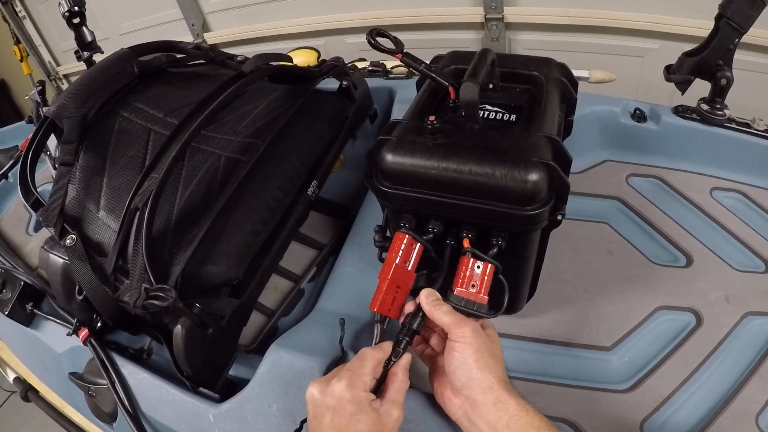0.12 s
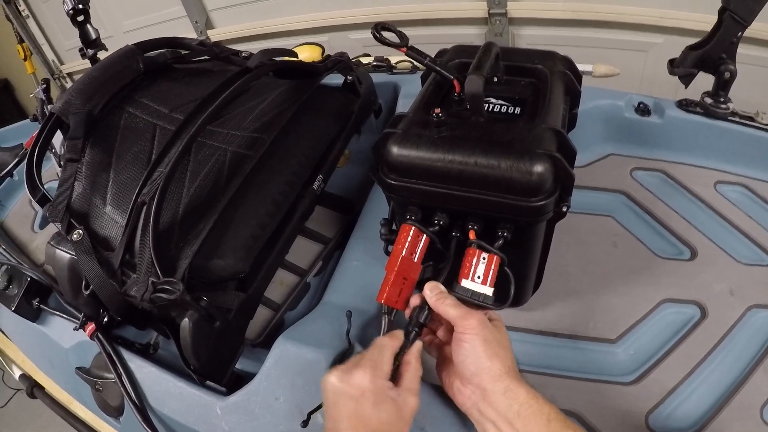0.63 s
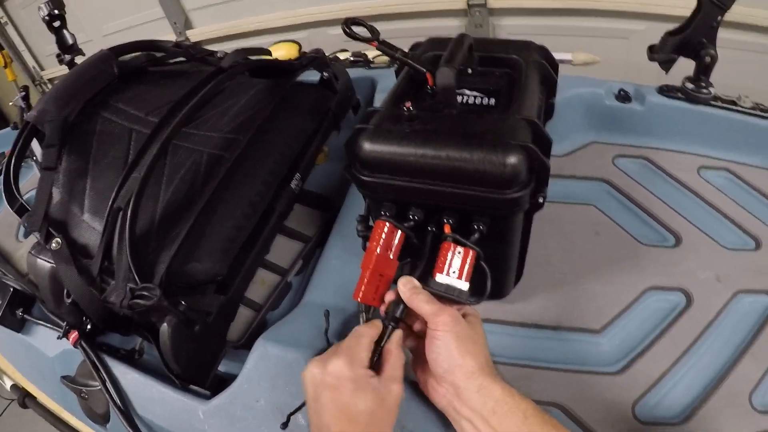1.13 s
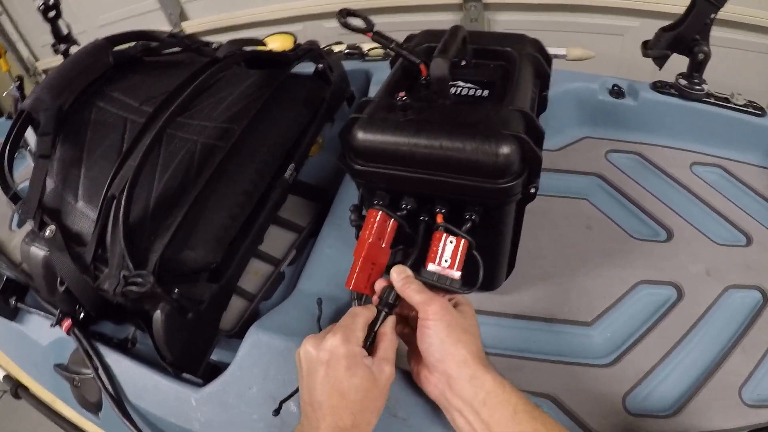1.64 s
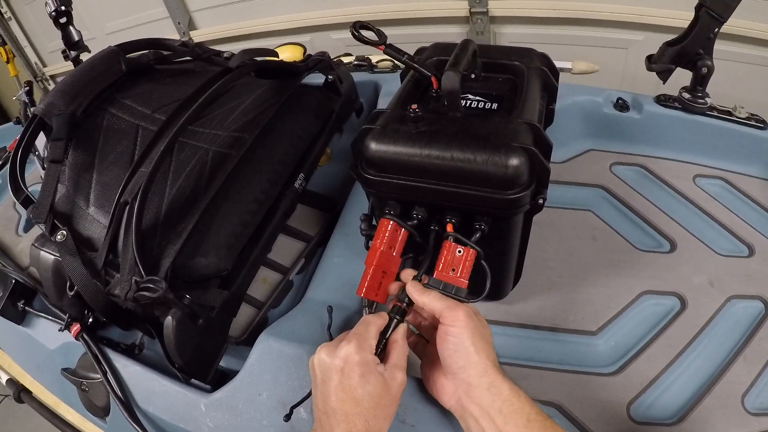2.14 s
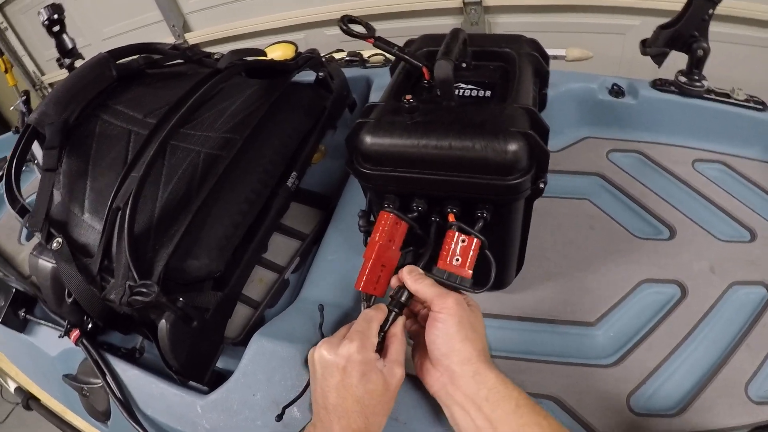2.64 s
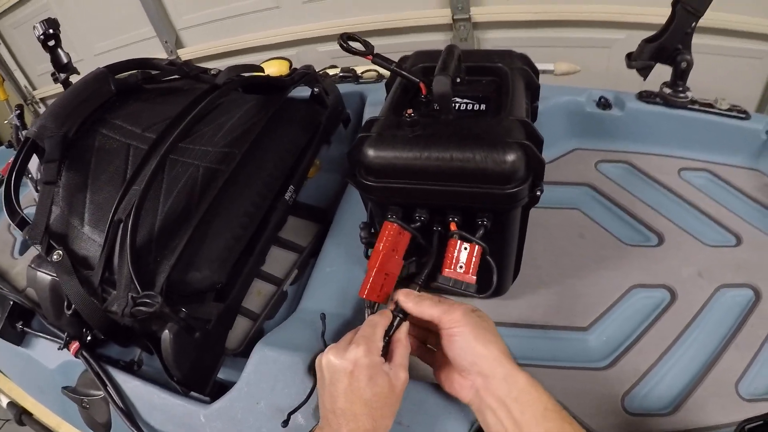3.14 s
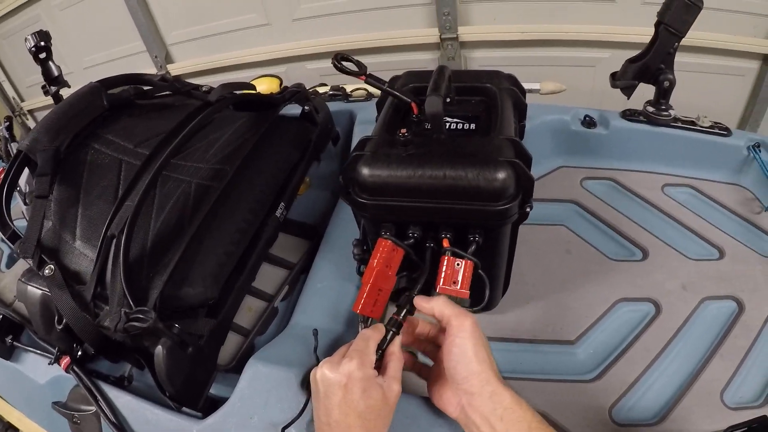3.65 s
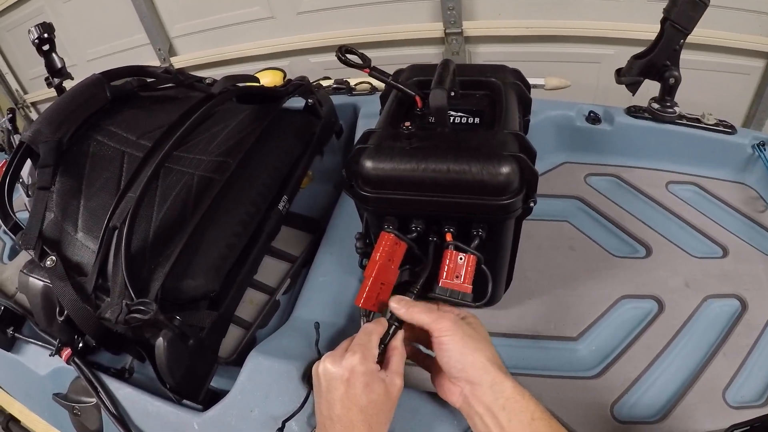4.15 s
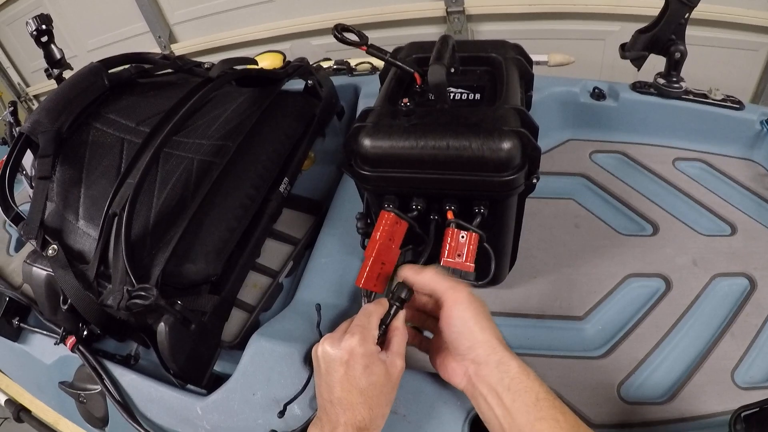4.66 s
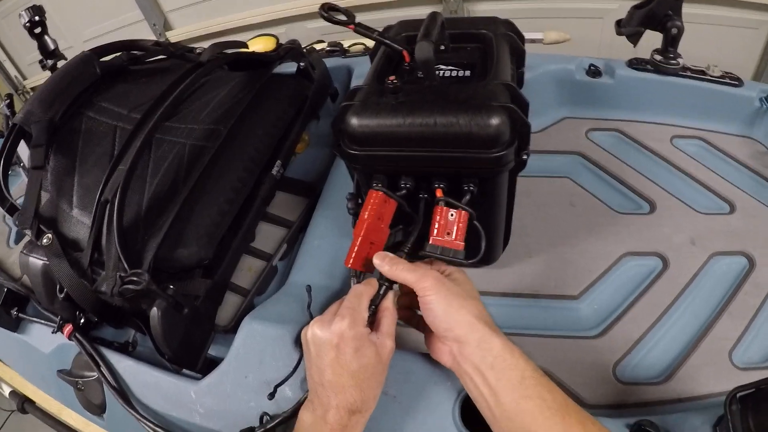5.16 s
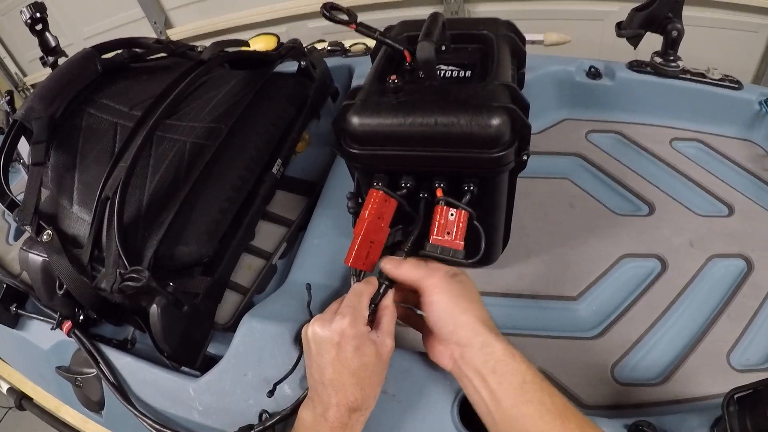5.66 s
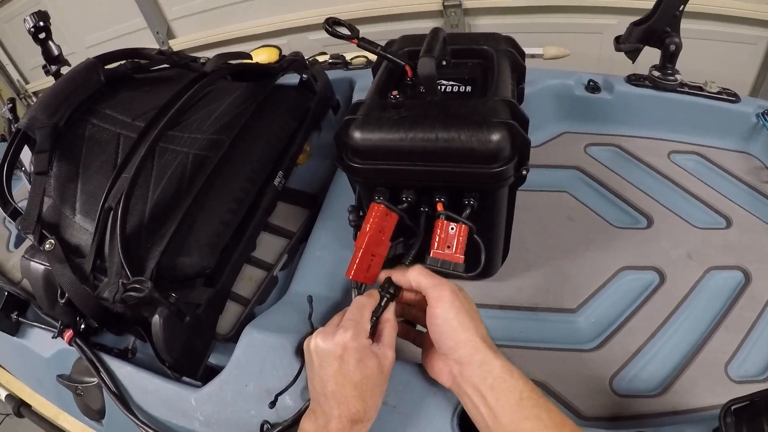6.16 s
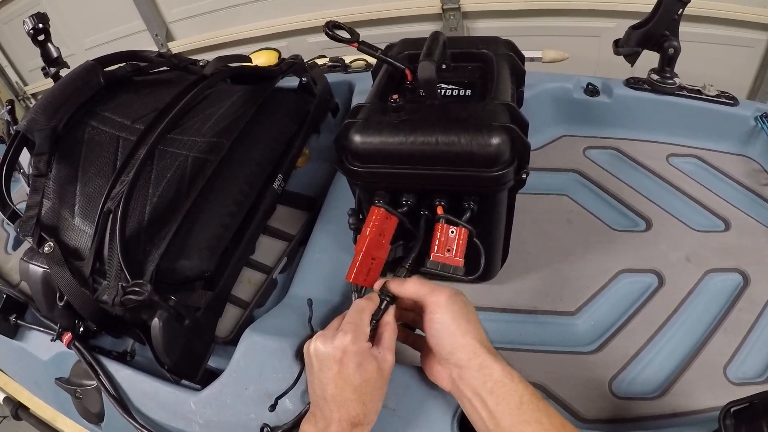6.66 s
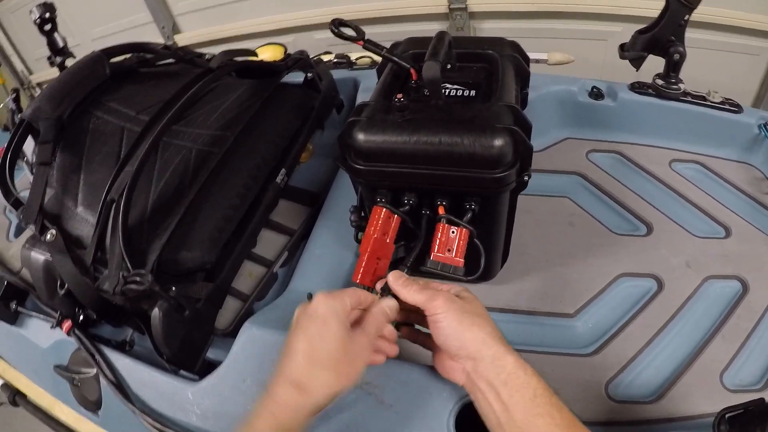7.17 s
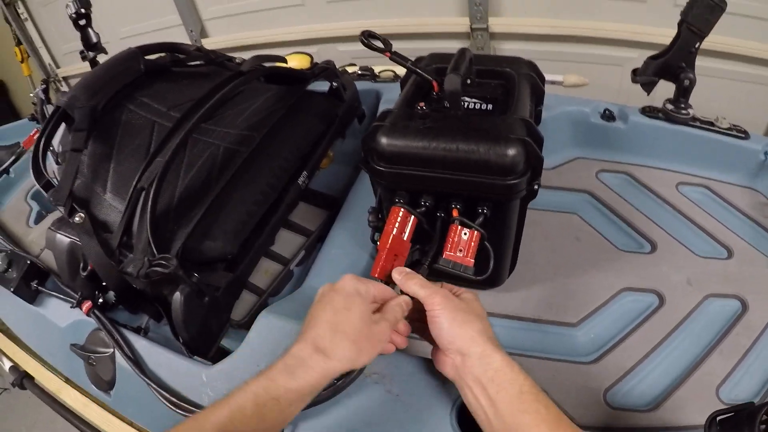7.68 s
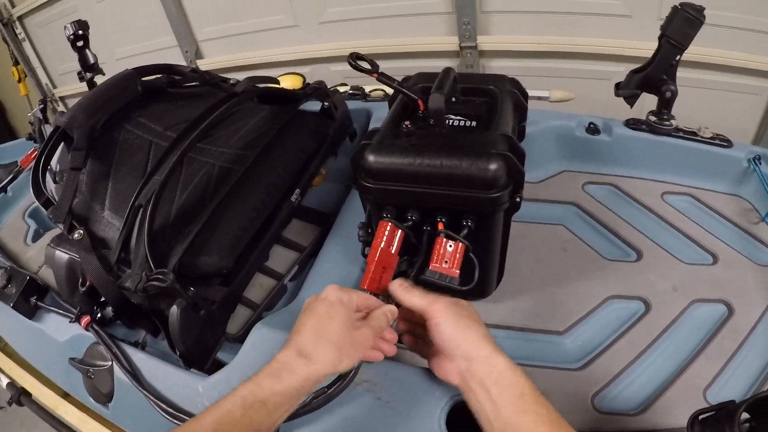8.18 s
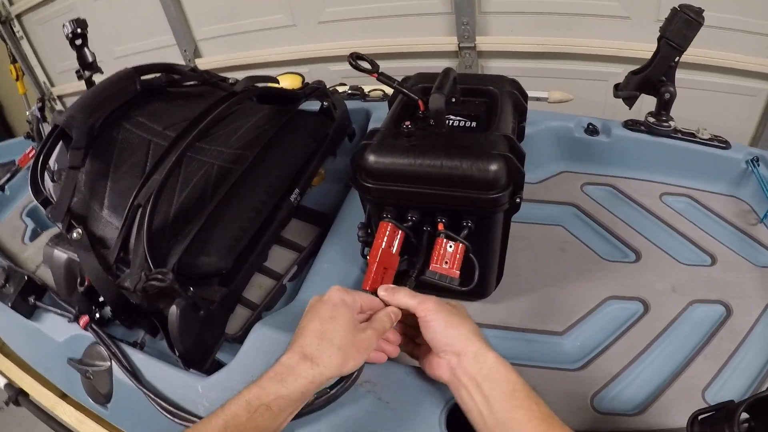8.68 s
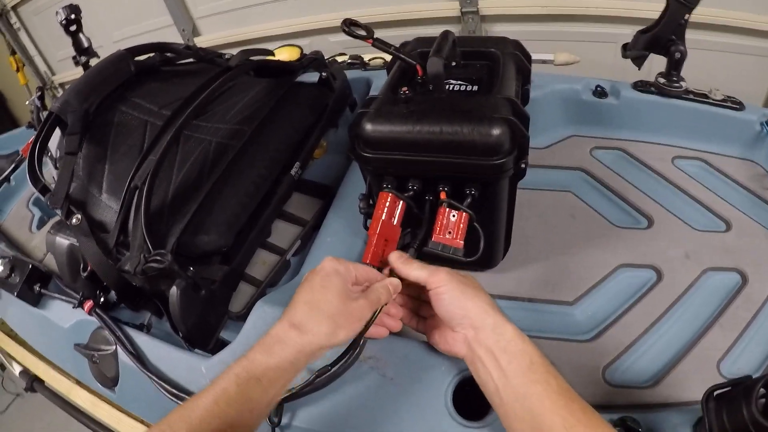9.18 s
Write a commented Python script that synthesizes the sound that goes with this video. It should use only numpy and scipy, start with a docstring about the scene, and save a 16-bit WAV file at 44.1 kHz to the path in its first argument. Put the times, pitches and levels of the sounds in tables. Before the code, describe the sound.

Irregular small plastic clicks, close up, as fingers turn and seat a connector. Each has a bright plug ring and a boxy case knock, some with a crisp crack. Tiny scrapes and rubbing fill the gaps, and hands bump the hollow plastic deck with muted thuds. Busy until just after six seconds, then quieter and sparse. A garage gives a short bright echo over quiet room air.

```python
"""Fingers screw a small plastic plug onto a hard plastic case on the hollow deck of a boat in a garage.
Close by, clicks and taps ring plug, socket and case modes, a few with a treble crack; short scrapes, rattles
and rubs are grains in the same modes. Hands knock the deck, a thud and shell modes, and fumble in small slips.
Hard walls ring on as decaying noise bands, over shaped air noise, thin hum tones and gusts of deep bass.
The microphone is a small camera with two ports and a bass cut."""
import sys
import numpy as np
from scipy import signal
from scipy.fft import rfft, irfft
from scipy.io import wavfile
from scipy.ndimage import uniform_filter1d

SR = 44100
rng = np.random.default_rng(int(sys.argv[2]) if len(sys.argv) > 2 else 0)


def unload_audio(sound):
    """Save the sound as a 16-bit wav file, at the path given as the first command line argument."""
    columns = np.transpose(np.atleast_2d(sound))
    # keep every value between -1 and 1, then stretch to whole-number steps
    steps = np.round(np.clip(columns, -1, 1) * 32767)
    wavfile.write(sys.argv[1], SR, steps.astype(np.int16))


def ratio(d):
    """dB to gain"""
    e = np.asarray(d, float) / 20
    return 10 ** e


N = 410571
TIME = np.arange(N) / SR
SIDES = np.array([[1], [-1]])  # a side signal enters left and right with opposite signs


def level(x, db):
    """Scale to an rms level in dB."""
    return x * ratio(db) / np.sqrt(np.mean(x ** 2))


def on_log_axis(hz, table, column=1):
    """Read a table between its rows on a logarithmic frequency axis."""
    table = np.array(table, float)
    return np.interp(np.log(hz + 1), np.log(table[:, 0]), table[:, column])


def ring(x, modes):
    """A steady rub or rattle heard through the resonances of a body."""
    out = 0
    for hz, width, db in modes:
        b, a = signal.iirpeak(hz, hz / width, SR)
        out = out + ratio(db) * signal.lfilter(b, a, x)
    return out


def strikes(modes, db, rise_s, length_s, scatter_db, aim_hz=None, aim_octaves=1., phase_spread=1.22):
    """One ring per blow, peaking at db; modes near the aimed pitch are favoured, and each mode varies."""
    # axes: blow, mode, time
    hz, width, mode_db = np.transpose(modes)[:, None, :, None]
    chance = rng.standard_normal((len(db), len(modes), 3))
    gain = ratio(mode_db + scatter_db * chance[..., :1])
    if aim_hz is not None:
        octaves_off = np.log2(hz / aim_hz[:, None, None])
        gain = gain / (1 + (octaves_off / aim_octaves) ** 2) ** 1.28
    t = np.arange(int(length_s * SR)) / SR
    detune = 1 + 0.025 * chance[..., 1:2]
    phase = 2 * np.pi * hz * detune * t + phase_spread * chance[..., 2:]  # radians
    decay = np.exp(-np.pi * width * t)
    rings = (gain * decay * np.sin(phase)).sum(axis=1)
    rings = rings * (1 - np.exp(-t / rise_s)) ** 2
    return rings * (ratio(db) / np.abs(rings).max(axis=1))[:, None]


def place(times, rings, pan_db):
    """Lay each ring down at its moment; pan_db is how far left stands above right."""
    out = np.zeros((2, N + rings.shape[1]))
    for s, one, db in zip(times, rings, pan_db):
        start = int(s * SR)
        out[:, start:start + len(one)] += one * ratio(np.array([[db], [-db]]) / 2)
    return out[:, :N]


def grains(rate, spread_db, contact_s):
    """Random tiny slips, rate per second, mostly weak, a few strong; a softer contact pushes longer."""
    chance = rng.random((3, N))
    happens = chance[0] < rate / SR
    strength = ratio(-spread_db * np.log(1 - chance[2]))
    slips = happens * np.sign(chance[1] - .5) * strength
    return np.convolve(slips, np.hanning(int(contact_s * SR) + 3), "same")


def chatter(*parts, count=3):
    """A click is not one touch: the parts touch a few more times at uneven moments, weaker each time."""
    within_s, step_db = .003, -8
    chance = rng.random((len(parts[0]), count, 2))
    touches = np.zeros((len(chance), int(.008 * SR)))
    touches[:, 0] = 1
    for k in range(count):
        lag = ((k + chance[:, k, 0]) / count * within_s * SR).astype(int) + 8
        sign = np.sign(chance[:, k, 1] - .5)
        touches[np.arange(len(lag)), lag] = ratio(step_db * (k + 1.5)) * sign
    touches /= np.sqrt((touches ** 2).sum(axis=1))[:, None]  # equal energy for every pattern of touches
    return [signal.fftconvolve(part, touches, axes=1) for part in parts]


def shaking(times, db, settle_s):
    """A level that jumps at each blow and settles again."""
    blows = np.zeros(N)
    blows[(times * SR).astype(int)] = ratio(db) ** 2
    return np.sqrt(signal.lfilter([1], [1, -np.exp(-2 / (settle_s * SR))], blows))


# Spectrum of the still air and hiss. Each row: frequency in Hz, relative density in dB per Hz.
AIR_SPECTRUM = [(12, -53), (20, -13.5), (101, -30.5), (150, 4.5), (222, 1), (262, -4.5), (388, -8),
                (642, -14), (976, -14), (1060, -16), (1400, -18), (2260, -24), (9400, -27.5), (13900, -39),
                (16000, -43)]
# How alike the air is at the two ports. Each row: frequency in Hz, left-right correlation from -1 to 1.
AIR_LIKENESS_AT_PORTS = [(60, 0.18), (130, 0.68), (290, -0.024), (640, -0.77), (1410, -0.7), (3100, 0.24),
                         (6820, 0.031), (15000, -0.024)]


def air():
    """Still room air and circuit hiss, most alike in the bass and opposed where the ports are steered apart."""
    mid_db = -50  # rms of the part common to both ports
    hz = np.fft.rfftfreq(N, 1 / SR)
    like = np.clip(on_log_axis(hz, AIR_LIKENESS_AT_PORTS), -.95, .95)
    weights = np.array([np.ones_like(like), np.sqrt((1 - like) / (1 + like))])
    shape = ratio(on_log_axis(hz, AIR_SPECTRUM)) * weights
    mid, side = irfft(rfft(rng.standard_normal((2, N))) * shape, N)
    return (mid + side * SIDES) * ratio(mid_db) / mid.std()


# Tones of a distant appliance. Each row: frequency in Hz, level in dB rms.
HUM_TONES = [(468, -72), (958.5, -68), (1373, -104), (2040, -70.5), (2159, -73.5)]


def hum():
    """Thin tones of a distant appliance, wavering slightly as their phases drift at random."""
    drift = np.cumsum(rng.standard_normal((len(HUM_TONES), N)), axis=1) * 0.01437  # radians
    out = 0
    for (hz, db), wander in zip(HUM_TONES, drift):
        out = out + np.sqrt(2) * ratio(db) * np.sin(2 * np.pi * hz * TIME + wander)
    return out


def rumble():
    """The deepest bass, noise below 75 Hz, comes in faint gusts."""
    lowpass = signal.butter(4, 75, fs=SR, output="sos")
    deep = signal.sosfilt(lowpass, rng.standard_normal(N))
    steps = np.repeat(rng.standard_normal(N // 4000 + 1), 4000)
    gusts = uniform_filter1d(steps, size=3000)[:N]
    return level(deep * ratio(7.0 * gusts), -77)


# How hard the hands work. Each row: time in seconds, effort in dB before the offset of each layer.
HAND_EFFORT = [(0, -78), (.3, -57), (1.25, -45), (1.5, -60), (1.8, -45.5), (2.2, -65.5), (2.5, -35.5),
               (2.8, -54.5), (2.98, -48.5), (3.14, -56), (3.4, -41), (3.58, -50.5), (4.0, -67),
               (4.15, -49.5), (4.6, -59), (5.6, -51.5), (6.3, -51), (7.3, -52.5), (8.9, -46.5), (9.31, -58)]


def hands():
    """Small unsteady contacts all the while: creaks in the deck, ticks in the case, fine rubbing at the plug."""
    fumble_db, rub_db = -18, -22.5  # offsets from the effort
    shake_db, settle_s = -31.5, 0.2  # shake against the case knock
    effort = ratio(np.interp(TIME, *np.transpose(HAND_EFFORT)))
    s, case_db = np.transpose(CLICKS_AND_TAPS)[:2]
    # after a click or tap the loose parts of the case go on shaking
    fumble = np.hypot(effort * ratio(fumble_db), shaking(s, case_db + shake_db, settle_s))
    creaks = effort * level(ring(grains(220, 2.2, 0.0012), DECK_MODES), -4.5)
    ticks = fumble * level(ring(grains(400, 1.8, 0.00024), CASE_MODES), 0.42)
    rub = effort * ratio(rub_db) * level(ring(grains(4300, 2.1, .0001), PLUG_MODES), -3.5)
    return creaks + ticks + rub


# Echo of the hard walls. Each row: frequency in Hz, 60 dB decay time in seconds, relative level in dB,
# left-right correlation from -1 to 1.
GARAGE_ECHO = [(200, 0.41, 3, 0.84), (513, 0.64, 0, 0.71), (1230, 0.24, 4, 0.046), (3650, 0.66, -3.5, 0.47),
               (6000, 0.63, 0.5, 0.069), (10900, 0.57, 6.5, 0.05), (14400, 0.21, 4, .1)]


def garage(x):
    """Dense echoes from hard walls, partly different at each port, each band dying at its own pace."""
    echo_db, gap_s = -1, 0.0015  # echo energy against the sound sent in; time over which echoes build up
    wall_s, wall_db = 0.01676, 2  # moment of the wall slap, and its height against the tail
    t = np.arange(int(.7 * SR)) / SR
    tail = np.zeros((2, len(t)))
    for hz in 140 * 2 ** np.arange(0, 6.8, .5):
        band = signal.butter(2, [hz / 2 ** 0.28, hz * 2 ** 0.24], "bandpass", fs=SR, output="sos")
        band_db = on_log_axis(hz, GARAGE_ECHO, column=2)
        fade = ratio(band_db - 60 * t / on_log_axis(hz, GARAGE_ECHO))
        like = np.clip(on_log_axis(hz, GARAGE_ECHO, column=3), -.95, .95)
        mid, side = fade * signal.sosfilt(band, rng.standard_normal(tail.shape))
        tail += np.sqrt(1 + like) * mid + np.sqrt(1 - like) * side * SIDES
    # gear piled on the deck scatters the first moments more strongly
    tail *= (1 - np.exp(-t / gap_s)) ** 2 * (1 + 2.9 * np.exp(-t / 0.0044))
    # the nearest wall answers as one distinct slap
    tail *= 1 + ratio(wall_db) * np.exp(-((t - wall_s) / 0.00096) ** 2)
    tail = tail / np.sqrt((tail ** 2).sum() / 2)
    return ratio(echo_db) * signal.fftconvolve(x[None], tail)[:, :N]


# Clicks and taps of plug and case. Each row: start in seconds, case knock in dB peak, plug ring in dB peak,
# plug pitch in Hz; levels before chatter and lean.
CLICKS_AND_TAPS = [(0.4172, -40.5, -68, 6470), (0.4622, -42.5, -60, 7660), (0.514, -38, -56, 7360),
                   (0.5842, -33, -38.5, 6400), (0.9066, -34, -42, 6360), (0.919, -30.5, -39.5, 6370),
                   (1.028, -38.5, -64, 5200), (1.1321, -32.5, -44, 5790), (1.204, -45, -55, 5610),
                   (1.228, -42, -51, 6430), (1.252, -36, -58, 4810), (1.3737, -37.5, -47, 6400),
                   (1.7502, -41, -52, 6900), (1.8224, -33.5, -41, 5940), (1.8455, -38, -52, 6390),
                   (1.9963, -30, -46, 5200), (2.0506, -33, -33, 4280), (2.156, -43, -51, 5100),
                   (2.4446, -37, -51, 6400), (2.458, -25.5, -30.5, 4660), (2.4773, -36, -27.5, 5940),
                   (2.5553, -35, -36, 4900), (2.5707, -30, -26.5, 4900), (2.5752, -38, -44, 5000),
                   (2.756, -43, -79, 6140), (2.8691, -32, -38, 6140), (2.931, -43, -38.5, 5970),
                   (2.94, -45, -42, 5900), (2.9577, -56, -41, 6730), (2.9715, -32.5, -44, 5680),
                   (2.9782, -41, -28, 4880), (3.244, -27, -36, 6000), (3.2981, -28.5, -18.5, 5700),
                   (3.3166, -24, -19.5, 6900), (3.331, -26, -30, 6680), (3.381, -34, -31, 6690),
                   (3.422, -14.5, -12.5, 7400), (3.6743, -35, -40, 6000), (3.716, -38, -57, 4920),
                   (3.7292, -32, -49, 4940), (3.755, -30, -25.5, 4700), (3.7657, -36, -28, 5050),
                   (3.982, -40, -68, 4860), (4.003, -34, -57, 4940), (4.012, -39, -57, 6700),
                   (4.0908, -25, -13.5, 5880), (4.234, -29.5, -49, 6120), (4.2778, -33.5, -32.5, 5300),
                   (4.3815, -27, -17, 5810), (4.594, -35.5, -37, 5500), (4.659, -38, -48, 6990),
                   (4.7354, -30, -41.5, 4650), (4.7851, -31, -40.5, 6910), (4.8684, -31.5, -32.5, 5050),
                   (4.9083, -32, -40, 7700), (5.034, -24, -24, 5050), (5.018, -43, -48, 7000),
                   (5.1534, -37, -58, 5760), (5.172, -42, -50, 6000), (5.201, -44, -40, 4900),
                   (5.213, -40.5, -64, 5000), (5.31, -35, -30.5, 5700), (5.3649, -35.5, -41, 5760),
                   (5.4687, -38.5, -50, 4640), (5.496, -38, -55, 5030), (5.521, -49, -33, 4760),
                   (5.5573, -44, -46, 5490), (5.6248, -34, -42, 5470), (5.6366, -33.5, -52, 5800),
                   (5.7398, -26, -29, 6200), (5.791, -26.5, -36, 5240), (5.895, -38.5, -25, 5000),
                   (6.0118, -22.5, -26.5, 5300), (6.0713, -30.5, -34.5, 5000), (6.1823, -23, -13, 5540),
                   (6.59, -44, -42.5, 5850), (6.758, -36, -43.5, 6160), (6.779, -35, -49, 6500),
                   (7.051, -41.5, -42.5, 6160), (7.442, -44, -58, 6110), (7.9257, -45, -46, 4830),
                   (8.1193, -39, -41, 4200), (8.1274, -45, -26.5, 7150), (8.1666, -36, -44, 7040),
                   (8.203, -41, -34, 4900), (8.6363, -40, -65.5, 6550), (8.773, -34.5, -36.5, 6300)]
# Second rings of some clicks, low or high, a few with a treble crack. Each row: start in seconds,
# crack in dB peak, second ring in dB peak, second pitch in Hz; levels before chatter and lean.
SECOND_RINGS = [(0.585, -64, -46, 1200), (.9066, -58, -34, 1200), (0.921, -56, -43, 1200),
                (1.9964, -50, -55, 3530), (2.0502, -54, -39, 4650), (2.4581, -40, -31, 5050),
                (2.478, -42, -34, 7100), (2.5704, -51, -51, 6340), (2.9792, -50, -35, 3600),
                (3.2982, -26, -18, 6900), (3.317, -23, -19, 4700), (3.331, -48, -40, 5000),
                (3.4222, -18.5, -12.5, 5200), (3.755, -52, -34, 6600), (4.0895, -28.5, -20, 4760),
                (4.091, -56, -24, 2200), (4.2782, -52, -49, 6500), (4.381, -35.5, -16, 4970),
                (4.382, -56, -31, 2500), (4.384, -53, -30, 7600), (4.8685, -48, -37, 7300),
                (4.8695, -58, -29, 1600), (4.9082, -58, -30.5, 1200), (5.0353, -35, -23.5, 3470),
                (5.308, -56, -38, 2100), (5.5208, -50, -54, 6550), (5.7404, -44, -25, 4730),
                (5.894, -51, -45, 6200), (6.0122, -46, -31, 7000), (6.0715, -50, -37, 6400),
                (6.1822, -30.5, -27.5, 7000), (6.5897, -66, -54, 5060), (8.119, -42, -39, 6500),
                (8.1267, -31.5, -32, 4380), (8.128, -58, -28, 850), (8.773, -48, -33.5, 3600)]
# Resonances of the plug. Each row: frequency in Hz, width in Hz, relative level in dB.
PLUG_MODES = [(4300, 480, -3), (5050, 320, -4), (5720, 470, 4.5), (6340, 530, 4.5), (6900, 810, 12),
              (7600, 210, -4.5)]
# Resonances of the hard case. Each row: frequency in Hz, width in Hz, relative level in dB.
CASE_MODES = [(875, 710, -3), (1201, 230, 11), (1330, 195, -0.5), (1633, 260, 7), (1985, 710, 7)]
# Resonances of the socket between plug and case. Each row: frequency in Hz, width in Hz, relative level in dB.
SOCKET_MODES = [(2370, 520, 2), (3195, 520, 1), (3640, 370, -4.5), (4600, 3000, 15.5)]
# Treble resonances of the crack. Each row: frequency in Hz, width in Hz, relative level in dB.
CRACK_MODES = [(10150, 490, -7), (10120, 600, -5.5), (10650, 1530, -2), (13200, 830, -9),
               (15100, 1800, -24)]


def plug_and_case():
    """Clicks and taps ring plug, socket and case modes: as heard close by, and as the walls get them."""
    s, case_db, plug_db, hz = np.transpose(CLICKS_AND_TAPS)
    second_s, crack_db, second_db, second_hz = np.transpose(SECOND_RINGS)
    # the socket takes a share of plug and case
    plug_share, aim_octaves = 0.42, 0.18
    socket_db = -0.5 + plug_share * plug_db + (1 - plug_share) * case_db

    plug = strikes(PLUG_MODES, plug_db, .0003, .02, 1.0, hz, aim_octaves)
    second_modes = CASE_MODES + SOCKET_MODES[:3] + PLUG_MODES
    second = strikes(second_modes, second_db, .0003, .02, 1.0, second_hz, aim_octaves)
    body = strikes(SOCKET_MODES, socket_db, 0.00052, .02, 0.66)
    body = body + strikes(CASE_MODES, case_db, 0.00035, .02, 3.0)
    crack = strikes(CRACK_MODES, crack_db, 0.00027, .02, 2.5)

    # the ring beams at the microphone; what spreads all round is mostly its first moment, broader in tone
    spread_s = .0011
    first = np.exp(-np.arange(plug.shape[1]) / SR / spread_s)
    all_round = first * ratio(5.0) * plug + np.sqrt(first) * ratio(3.5) * body
    second_all_round = first * (ratio(-0.5) * crack + ratio(2.0) * second)
    for_walls = place(s, all_round, 0 * s) + place(second_s, second_all_round, 0 * second_s)

    plug, body = chatter(plug, body)
    crack, second = chatter(crack, second)
    # the two ports face different ways, so each part leans to a side, more or less each time
    plug_lean_db, body_lean_db = np.array([[1.5], [-1.5]]) + 3.0 * rng.standard_normal((2, len(s)))
    crack_lean_db = -7.5 + 3.0 * rng.standard_normal(len(second_s))
    second_lean_db = 3.0 * rng.standard_normal(len(second_s))
    direct = place(s, plug, plug_lean_db) + place(s, body, body_lean_db)
    direct += place(second_s, crack, crack_lean_db)
    direct += place(second_s, second, second_lean_db)

    # deck and case wall repeat the click at once
    rings = plug + body
    bounce = ratio(-14.5) * place(s + .0012, rings, -plug_lean_db)
    bounce += ratio(-25.0) * place(s + .0027, rings, body_lean_db)
    return direct + bounce, for_walls[0]


# Hands knocking the deck. Each row: start in seconds, thud level in dB peak, pitch in Hz.
DECK_KNOCKS = [(.419, -36.5, 280), (.464, -32, 225), (0.5835, -22.5, 360), (0.5988, -27.5, 450),
               (0.6143, -31, 400), (0.63, -26.5, 382), (.643, -32, 400), (0.811, -45, 230),
               (0.835, -44, 166), (0.9052, -20, 390), (0.9189, -21, 387), (0.9345, -26.5, 294),
               (0.9405, -25, 292), (0.9541, -28, 400), (1.021, -31, 215), (1.187, -34.5, 369),
               (1.227, -31.5, 148), (1.351, -35.5, 155), (1.373, -25.5, 387), (1.384, -33, 215),
               (1.641, -41, 215), (1.995, -30, 402), (2.051, -34, 170), (2.478, -44, 304),
               (2.554, -33, 248), (2.872, -32.5, 420), (2.903, -31, 400), (3.217, -36.5, 290),
               (3.754, -32.5, 393), (4.089, -31, 238), (4.738, -31.5, 240), (4.786, -35.5, 209),
               (5.365, -36, 254), (6.696, -39, 390), (6.758, -33, 228), (6.784, -28, 395),
               (7.049, -34.5, 217), (7.439, -28.5, 244), (7.9258, -29, 322), (8.1269, -25, 224),
               (8.1666, -26.5, 416), (8.202, -28, 424), (8.221, -37, 422), (8.24, -43, 300),
               (8.451, -39, 241), (8.633, -35.5, 348), (8.775, -42, 350), (8.787, -38, 400),
               (8.9113, -27, 250), (9.021, -45, 251), (9.123, -41, 186), (9.231, -41.5, 190)]
# Blunt resonances where a blow lands. Each row: frequency in Hz, width in Hz, relative level in dB.
THUD_MODES = [(215, 140, -2), (345, 235, 8), (483, 213, -3.5), (710, 200, 5)]
# Resonances of the hollow shell. Each row: frequency in Hz, width in Hz, relative level in dB.
DECK_MODES = [(166, 36, -5), (193, 320, -1), (217, 26, -1.5), (273.5, 34, -0.5), (293.5, 24, -8.5),
              (399, 42, 0), (470, 19.7, 0.5), (530, 110, -12), (1180, 570, -3.5)]


def deck():
    """Soft blows of hand and case on the hollow shell: a blunt thud where it lands, then the ring of the shell."""
    # every click or tap goes down through the case into the deck
    under_case_db, under_case_hz, scatter_octaves = -8, 400, 0.18
    click_s, case_db = np.transpose(CLICKS_AND_TAPS)[:2]
    spots_hz = under_case_hz * 2 ** (scatter_octaves * rng.standard_normal(len(click_s)))
    from_case = [click_s, case_db + under_case_db, spots_hz]
    s, db, hz = np.hstack([np.transpose(DECK_KNOCKS), from_case])
    thud = strikes(THUD_MODES, db, 0.0013, .12, 0.63, hz, 0.81, phase_spread=0.2)
    # blows near the stiff edge of the deck sound higher and leave less ring
    ring_db, per_octave_db, middle_hz = -3, -9.5, 230
    shell_db = db + ring_db + per_octave_db * np.log2(hz / middle_hz)
    shell = strikes(DECK_MODES, shell_db, 0.0019, .12, 1.1, hz, 0.31, phase_spread=0.36)
    return place(s, thud + shell, 0 * s)[0]


# Short scrapes, rattles and rubs at case, plug and cable. Each row: middle in seconds, half length in seconds,
# coarse part through the case in dB, fine part through the plug in dB; levels are rms at the middle.
SCRAPES_AND_RUBS = [(1.749, 0.0097, -57, -54.5), (2.354, 0.074, -64, -58.5), (3.038, 0.16, -60, -59),
                    (3.279, 0.0075, -43, -49), (3.325, 0.013, -37.5, -39), (3.412, 0.0031, -57, -38.5),
                    (3.423, 0.0056, -37, -30), (3.492, 0.076, -50, -59), (3.73, 0.016, -49, -59),
                    (3.77, 0.021, -42, -50), (4.026, 0.013, -50.5, -69), (4.083, 0.0018, -40, -40),
                    (4.154, 0.071, -66, -52), (5.035, 0.002, -44, -33), (5.166, 0.02, -50.5, -59),
                    (5.487, 0.021, -50, -61), (5.548, .008, -62, -50), (5.694, 0.013, -47.5, -57),
                    (5.742, 0.0084, -37, -37.5), (6.011, 0.0074, -38, -41), (6.161, 0.0015, -61, -50),
                    (6.174, 0.0016, -74, -43), (6.266, 0.0048, -34, -40), (6.281, 0.0029, -41, -50),
                    (6.78, 0.0081, -66, -57), (7.148, 0.12, -74, -59), (7.82, .05, -63, -65),
                    (8.125, 0.0073, -39.5, -42)]


def scrapes():
    """Short scrapes, rattles and rubs: grains that swell and fade, coarse in the case modes, fine in the plug's."""
    case = level(ring(grains(650, 2.0, .0004), CASE_MODES), 0)
    plug = level(ring(grains(3500, 1.45, .0001), PLUG_MODES + SOCKET_MODES), 0)
    out = np.zeros(N)
    for s, half_s, case_db, plug_db in SCRAPES_AND_RUBS:
        swell = np.exp(-((TIME - s) / half_s) ** 2)
        out += swell * (ratio(case_db) * case + ratio(plug_db) * plug)
    return out


def scene():
    """Near sounds and their echoes pass the bass cut; air, hum and rumble lie under them uncut."""
    deck_to_walls_db, bass_cut_hz = -2.5, 169.6
    clicks, clicks_for_walls = plug_and_case()
    knocks = deck()
    handling = scrapes() + hands()
    # the deck is near and low, so the walls return less of it
    echoes = garage(clicks_for_walls + handling + ratio(deck_to_walls_db) * knocks)
    cut = signal.butter(6, bass_cut_hz, "highpass", fs=SR, output="sos")
    near = signal.sosfilt(cut, clicks + knocks + handling + echoes)
    return near + air() + hum() + rumble()


def roll_off(x):
    """The treble ends steeply here."""
    return signal.sosfilt(signal.butter(12, 16500, fs=SR, output="sos"), x)


def record(dry):
    """The camera keeps the finished mix of its two ports."""
    return roll_off(dry)


dry = scene()
out = record(dry)
unload_audio(out)
```